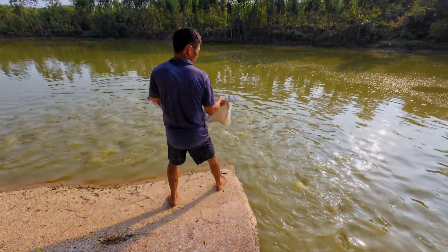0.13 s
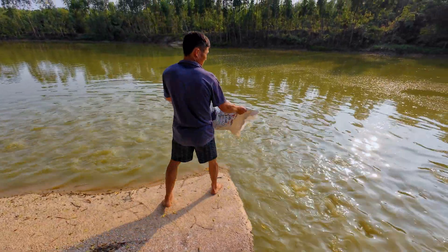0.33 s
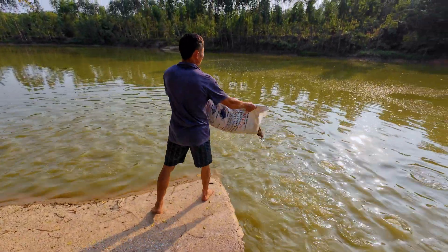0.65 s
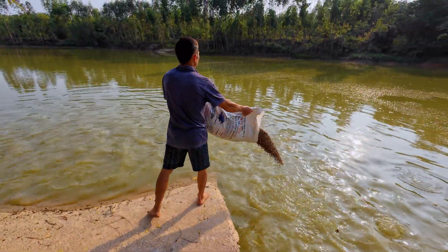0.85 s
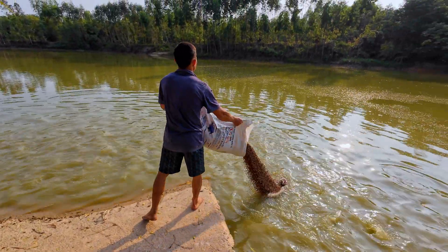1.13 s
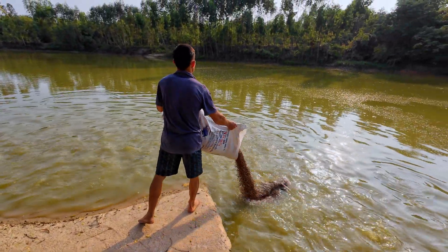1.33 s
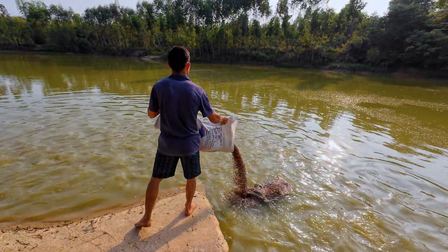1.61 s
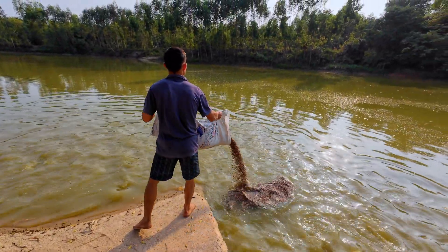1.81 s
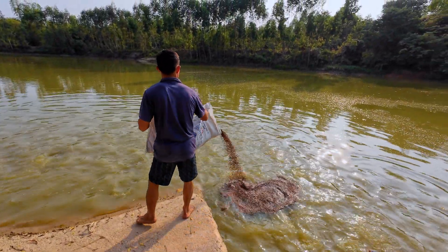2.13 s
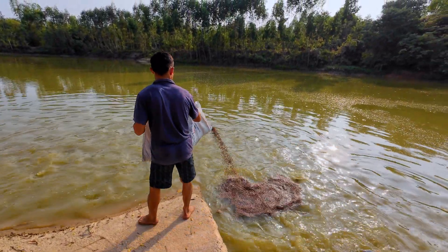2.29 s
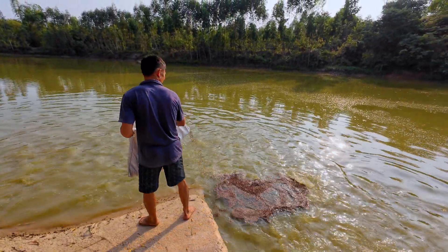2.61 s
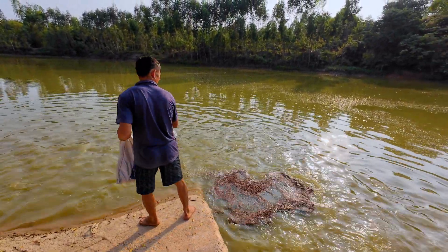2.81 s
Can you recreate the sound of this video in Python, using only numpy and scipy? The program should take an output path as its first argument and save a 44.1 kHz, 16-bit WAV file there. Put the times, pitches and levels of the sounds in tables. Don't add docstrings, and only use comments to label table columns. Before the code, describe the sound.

Dry feed pellets pour hissing from a tipped sack onto a pond, over distant engine putter

```python
import sys
import numpy as np
from scipy import signal
from scipy.fft import rfft, irfft
from scipy.io import wavfile

SR = 44100
rng = np.random.default_rng(int(sys.argv[2]) if len(sys.argv) > 2 else 0)


def generate_wav(sig):
    pcm = np.round(np.clip(np.atleast_2d(sig).T, -1, 1) * 32767).astype(np.int16)
    wavfile.write(sys.argv[1], SR, pcm)


def level_to_linear(level):
    exponent = np.asarray(level, float) / 20
    return 10 ** exponent


N = 130095


def in_time(rows):
    return np.interp(np.arange(N) / SR, *np.transpose(rows))


def at_hz(points, hz):
    point_hz, value = np.transpose(points)
    return np.interp(np.log(hz), np.log(point_hz), value)


def rms_one(x):
    return x / np.sqrt(np.mean(x ** 2) + 1e-20)


def drift(rate_hz):
    pole = np.exp(-40 * np.pi * rate_hz / SR)
    white = rng.standard_normal(N // 20 + 2002)
    slow = signal.lfilter([1], [1, -2 * pole, pole * pole], white)[2000:]
    return np.interp(np.arange(N) / 20, np.arange(len(slow)), rms_one(slow))


def ring(clicks, hz, t60_s, numerator=None):
    r = level_to_linear(-60 / (t60_s * SR))
    w = 2 * np.pi * hz / SR
    return signal.lfilter(numerator or [0, np.sin(w)], [1, -2 * r * np.cos(w), r * r], clicks + 1e-18)


def butter(x, hz, kind):
    return signal.sosfilt(signal.butter(2, hz, kind, fs=SR, output="sos"), x)


def wide(mid, side, hz):
    # hz, side_minus_mid_db
    side_by_hz = [(60, -8), (150, -23), (380, -21.5), (950, -29.5), (2400, -28), (5000, -19), (8500, -15),
                  (15000, -11)]
    return mid + level_to_linear(at_hz(side_by_hz, hz)) * side * np.array([[1], [-1]])


def grains(tone, per_s, cycles, sizes_db, clump_db, count=30):
    sizes = level_to_linear(sizes_db * np.minimum(rng.exponential(1, N), 5))
    clumps = level_to_linear(clump_db * (0.33 * drift(50) + 0.5 * drift(4)))
    hits = sizes * clumps * (rng.random(N) < per_s / SR)
    signs = rng.choice([-1, 1], (2, N))
    pitches = np.geomspace(tone[0][0], tone[-1][0], count)
    chance = np.sqrt(pitches)
    dealt = rng.choice(count, N, p=chance / chance.sum())
    out = 0
    for k, hz in enumerate(pitches):
        mid, side = rms_one(ring(hits * signs * (dealt == k), hz, cycles / hz, [1, 0, -1]))
        out = out + level_to_linear(at_hz(tone, hz)) * np.sqrt(hz) * wide(mid, side, hz)
    return rms_one(out)


def pour(pour_db):
    # pitch_hz, level_db per Hz
    hiss_tone = [(800, -10), (1300, -7.5), (1650, -5.5), (2350, 1.5), (2900, -3), (3600, 0), (5500, -5),
                 (15500, -9.5)]
    thins = 0.8
    share = level_to_linear(np.maximum(thins * (pour_db - pour_db.max()), -18))
    hiss = grains(hiss_tone, 40000 * share, cycles=34, sizes_db=2.4, clump_db=1.5, count=72)
    return level_to_linear(pour_db - 3.0) / np.sqrt(share) * hiss


def near_ticks():
    # start_s, peak_db
    near_pellets = [(0.3959, -27), (0.3996, -28), (0.6288, -26), (0.7205, -27), (0.9943, -28),
                    (1.0297, -27), (1.0428, -23), (1.0526, -24), (1.0574, -21), (1.0617, -23),
                    (1.1353, -18), (1.2138, -15), (1.3635, -16), (1.3706, -14), (1.5169, -15),
                    (1.5396, -13), (1.6487, -14), (1.6707, -14), (1.6792, -16), (1.7069, -15),
                    (1.7377, -16), (1.7426, -14), (1.8208, -16), (1.8683, -16), (1.9323, -17),
                    (1.9748, -13), (2.0029, -16), (2.0552, -17), (2.1003, -17), (2.122, -15), (2.1273, -18),
                    (2.2339, -19), (2.2436, -20), (2.2911, -18), (2.408, -20), (2.4554, -22), (2.5326, -20),
                    (2.5426, -19), (2.5536, -22), (2.5746, -23), (2.599, -24), (2.6027, -23), (2.613, -24),
                    (2.6338, -26), (2.6612, -13), (2.6951, -23), (2.7283, -19), (2.7513, -26),
                    (2.7579, -27), (2.7877, -29), (2.8022, -28), (2.8174, -25), (2.8264, -27),
                    (2.8334, -25), (2.8657, -28), (2.8901, -25), (2.9077, -29), (2.933, -33)]
    s, db = np.transpose(near_pellets)
    clicks = np.zeros(N)
    clicks[(s * SR).astype(int)] = level_to_linear(db + 1.5) * rng.choice([-1, 1], len(s))
    return 2 * butter(butter(clicks + 1e-18, 3200, "high"), 15000, "low")


def patter(pour_db):
    per_s, level_db, follows_pour = 220, -44, 0.75
    sizes = level_to_linear(4.5 * np.minimum(rng.exponential(1, N), 3.5))
    strays = sizes * (rng.random(N) < per_s / SR) * rng.choice([-1, 1], N)
    swell = level_to_linear(level_db + follows_pour * (pour_db - pour_db.max()))
    return swell * rms_one(butter(strays, 3500, "high"))


def slide(slide_db):
    # pitch_hz, level_db per Hz
    rustle_tone = [(250, -3.5), (658, -3), (1050, -7), (2950, -9.5), (4030, -10), (7130, -18.5),
                   (13000, -16), (15500, -7)]
    return level_to_linear(slide_db) * grains(rustle_tone, 36000, cycles=8.5, sizes_db=3, clump_db=2.5)


def rattle(slide_db):
    # pitch_hz, level_db per Hz
    rattle_tone = [(250, -13.5), (400, 0.5), (550, 4), (800, -6.5), (1200, -2), (2000, -9), (3800, -11.5)]
    level_db, follows_slide = -44, 0.36
    swell = level_to_linear(level_db + follows_slide * (slide_db - slide_db.mean()))
    return swell * grains(rattle_tone, 1500, cycles=26.0, sizes_db=2.8, clump_db=4.5)


def snaps():
    # start_s, peak_db, pitch_hz, length_s
    crackles = [(0.033, -33.5, 3100, 0.0037), (0.061, -23.5, 4700, 0.0078), (0.057, -33, 6100, 0.0044),
                (0.06, -23.5, 12500, 0.0061), (0.13, -32, 2300, 0.0066), (.178, -32, 6000, .003),
                (0.27, -23.5, 1500, 0.0073), (.2378, -24.5, 2700, .004), (0.249, -27, 1860, 0.0027),
                (.260, -25.5, 6100, 0.0018), (0.3, -20.5, 3600, 0.0018), (.301, -24, 2050, 0.0034),
                (0.268, -36, 1190, 0.0053), (0.308, -20, 1340, 0.002), (0.3174, -14.5, 3500, 0.0023),
                (.662, -23, 1300, .002), (1.029, -25, 2800, 0.0013), (0.46, -22, 2100, 0.0032),
                (2.691, -20.5, 3000, 0.0057), (1.3, -34, 2800, .003), (2.751, -20.5, 11000, 0.0008),
                (2.81, -27, 2800, .003), (2.6606, -14, 10000, 0.0014), (2.833, -21.5, 6300, 0.0014),
                (2.844, -24, 3900, 0.0025), (2.89, -23.5, 3600, 0.004), (2.904, -27, 14000, .002),
                (2.645, -26.5, 1340, .004), (2.814, -25, 1340, 0.0024), (0.018, -27, 1130, 0.0022)]
    ring_cycles, edge_db = 8.0, -17.0
    out = np.zeros((2, N + SR))
    t = np.arange(SR // 30) / SR
    for s, db, hz, length_s in crackles:
        uneven = rng.standard_normal(len(t)) ** 3 + 1.2 * (t == 0)
        burst = uneven * np.exp(-t / length_s * 2) * (t < 2 * length_s)
        body = ring(burst, hz, ring_cycles / hz, [1, 0, -1])
        body = butter(body, min(1.03 * hz, 18000), "low")
        edge = butter(burst, 3600, "high")
        sound = body / abs(body).max() + level_to_linear(edge_db) * edge / abs(edge).max()
        pan_db = rng.normal(0, 2) * np.array([[0.5], [-0.5]])
        out[:, int(s * SR):][:, :len(t)] += level_to_linear(db + pan_db) * sound
    return out[:, :N]


def gulps():
    # start_s, peak_db, pitch_hz
    fish_gulps = [(0.186, -32, 514), (0.266, -29, 574), (0.285, -26, 606), (0.308, -26.5, 545),
                  (0.432, -31.5, 530), (0.487, -32, 545), (0.647, -26, 880), (1.075, -28, 466),
                  (1.321, -24.5, 960), (1.36, -24.5, 473), (1.504, -28, 500), (1.632, -31.5, 403),
                  (1.655, -22, 566), (1.751, -29.5, 620), (1.933, -31, 410), (2.142, -28, 520),
                  (2.277, -30, 525), (2.304, -31, 530), (2.387, -27.5, 587), (2.41, -29, 444),
                  (2.453, -23.5, 812), (2.466, -20.5, 590), (2.466, -25, 930), (1.225, -30, 520),
                  (1.14, -30.5, 596), (1.94, -31, 540), (2.278, -30, 1040), (.855, -33, 1040),
                  (2.525, -32.5, 540), (2.867, -33, 736), (0.059, -32, 576), (0.136, -35, 950),
                  (.25, -32, 695), (.325, -25, 855), (.457, -28, 563), (.575, -37, 530), (.665, -27, 730),
                  (2.159, -27, 520), (2.545, -31, 522), (2.695, -30, 894), (2.884, -30, 697),
                  (2.927, -29.5, 945)]
    # start_s, peak_db, pitch_hz
    fish_swirls = [(0.44, -30.5, 405), (1.288, -30, 423), (1.754, -28, 330), (1.809, -42, 215),
                   (2.042, -37, 240), (2.227, -33.5, 261), (2.374, -37, 420), (2.393, -29.5, 282),
                   (2.492, -29.5, 244), (2.6, -33.5, 202), (2.612, -32.5, 270), (.294, -30.5, 296),
                   (.53, -32, 400), (0.614, -28, 1030), (.732, -34, 820), (0.776, -31, 560),
                   (1.725, -33, 477), (1.785, -32, 570)]
    cycles, attack_s, trim_db = 8.5, 0.00146, -1.67
    gulp_rise, swirl_rise = 0.21, 0.76
    wobble = 1 + 0.25 * drift(220)
    spray = butter(butter(rng.standard_normal(SR), 1300, "low"), 540, "high")
    spray = level_to_linear(-10) * rms_one(spray)
    bubbles = [(*g, gulp_rise) for g in fish_gulps] + [(*g, swirl_rise) for g in fish_swirls]
    out = np.zeros(N + SR)
    for s, db, hz, rise in bubbles:
        u = np.arange(0, 1, hz / cycles / SR)
        swell = np.sin(np.pi * u ** 0.8) ** 2
        tone = np.sin(2 * np.pi * cycles * (u + rise * (u * u - u) / 2))
        wet = tone + spray[int(s * SR / 4):][:len(u)]
        out[int((s - attack_s) * SR):][:len(u)] += level_to_linear(db + trim_db) * swell * wet
    return out[:N] * wobble


def engine():
    # time_s, firings_per_s
    firing_rate = [(0.0, 15.16), (0.26, 19.3), (0.3, 17.15), (0.41, 19.28), (0.55, 19.4), (0.76, 17.63),
                   (0.89, 21.29), (1.05, 17.22), (1.14, 20.57), (1.39, 22.62), (1.45, 20.82), (1.91, 21.61),
                   (1.94, 23.19), (1.99, 21.84), (2.24, 20.3), (2.55, 19.29), (2.75, 21.04), (2.95, 22.33)]
    # time_s, level_db
    load_curve = [(0, -23.5), (.2, -22), (.45, -19), (.6, -20.5), (1.2, -19), (1.7, -20), (2.2, -21),
                  (2.5, -23), (2.95, -21)]
    # start_s, loss_db
    misfires = [
        (2.19, -24),
        (2.29, -14.5),
        (2.39, -6),
    ]
    first_turn, firing_lead_s, firing_spread_db, earlier_firing_db = 0.272, 0.0102, 0.33, -22
    # lag_s, gain_db
    arrivals = [(0.0, 0.0), (0.008, 1.4), (0.0284, -12)]
    turns = first_turn + np.cumsum(in_time(firing_rate)) / SR
    at = np.flatnonzero(np.diff(np.floor(turns)))
    db = in_time(load_curve)[at] + firing_spread_db * rng.standard_normal(len(at))
    for s, loss_db in misfires:
        db[np.argmin(abs(at / SR - s))] += loss_db
    puffs = np.zeros(N + SR)
    puffs[0] = level_to_linear(earlier_firing_db)
    for lag_s, gain_db in arrivals:
        puffs[at + int((lag_s - firing_lead_s) * SR)] += level_to_linear(db + gain_db)
    soft = butter(puffs[:N], 224, "low")
    pipe = ring(soft, hz=128, t60_s=0.022)
    return butter(butter(pipe, 68, "high"), 42.3, "high")


def air():
    # pitch_hz, level_db
    air_tone = [(15, -44), (25, -22), (113, -0.5), (389, -11.5), (895, -11), (1170, -14), (6920, -28),
                (13200, -62), (15500, -48)]
    edges = 22 * 2 ** np.arange(0, 9.6, 0.5)
    white = rng.standard_normal((2, 2, N))
    out = 0
    for k, (low, high) in enumerate(zip(edges, edges[1:])):
        band = signal.butter(2, [low, high], "band", fs=SR, output="sos")
        mid, side = signal.sosfilt(band, white[k % 2])
        hz = np.sqrt(low * high)
        out = out + level_to_linear(at_hz(air_tone, hz) + 3.3 * drift(24)) * wide(mid, side, hz)
    return level_to_linear(-43) * rms_one(out)


def wind():
    level_db, lumps_db, top_hz = -58, 1, 45
    white = rng.standard_normal((2, N))
    mid, side = rms_one(butter(butter(white, top_hz, "low"), top_hz, "low"))
    return level_to_linear(level_db + lumps_db * drift(5)) * (mid + 0.72 * side * np.array([[1], [-1]]))


def scene():
    # time_s, level_db
    pour_curve = [(.99, -60), (1.025, -42.5), (1.06, -34), (1.1, -28.5), (1.17, -25.5), (1.25, -25),
                  (1.42, -27), (1.55, -25.5), (1.66, -27), (1.77, -25), (1.9, -27.5), (2.1, -28),
                  (2.3, -30), (2.45, -32), (2.56, -33), (2.63, -36.5), (2.75, -37), (2.95, -47)]
    # time_s, level_db
    slide_curve = [(0, -48), (.26, -47), (.33, -40), (.42, -34), (.65, -33), (.85, -38), (1.0, -38.5),
                   (2.3, -41), (2.8, -45.5), (2.95, -41)]
    pour_db, slide_db = in_time(pour_curve), in_time(slide_curve)
    water = pour(pour_db) + near_ticks() + patter(pour_db)
    sack = slide(slide_db) + rattle(slide_db) + snaps()
    return water + sack + gulps() + engine() + air() + wind()


def low_pass(x):
    return signal.sosfilt(signal.butter(12, 15710, fs=SR, output="sos"), x)


def record(dry):
    # centre_hz, width_hz, level_db
    mic_colour = [(5260, 1200, -1), (6470, 510, 1.5), (7020, 490, -4.5), (10300, 280, 2.5),
                  (11300, 1200, -3), (13040, 320, 2.5)]
    # pitch_hz, left_minus_right_db
    port_lean = [(60, -0.5), (130, 0), (290, -0.2), (640, 0.9), (1410, -0.24), (3100, 3), (6820, 1),
                 (15000, -3)]
    # pitch_hz, left_lead_radians
    port_lead = [(0, 0), (4130, 0.032), (5170, 0.69), (8530, -0.48), (9560, -0.28), (10600, -0.6),
                 (12800, 0.1), (15200, -0.1)]
    hz = np.arange(N // 2 + 1) * SR / N + 1
    bumps_db = sum(db * np.exp(-((hz - at) / width_hz) ** 2) for at, width_hz, db in mic_colour)
    rolloff_db = -8.5 * np.maximum(hz - 13560, 0) / 1000
    half = np.array([[0.5], [-0.5]])
    ports = level_to_linear(half * at_hz(port_lean, hz)) * np.exp(1j * half * np.interp(np.log(hz), *log_points(port_lead)))
    mix = irfft(rfft(dry) * level_to_linear(bumps_db + rolloff_db) * ports, N)
    return low_pass(mix)


def log_points(points):
    point_hz, value = np.transpose(points)
    with np.errstate(divide="ignore"):
        return np.log(point_hz), value


dry = scene()
out = record(dry)
generate_wav(out)
```